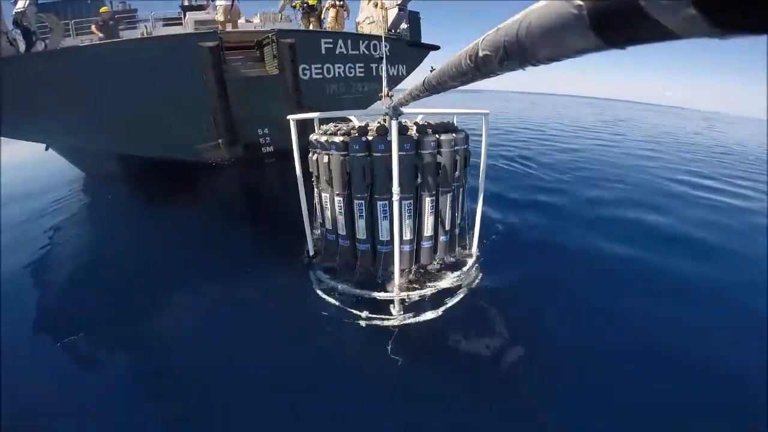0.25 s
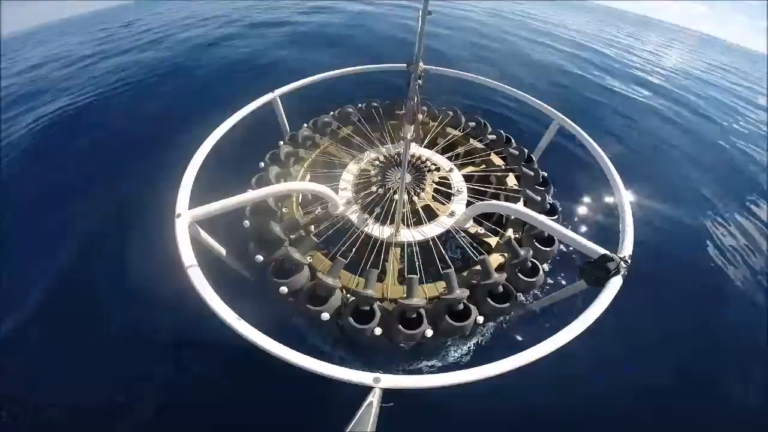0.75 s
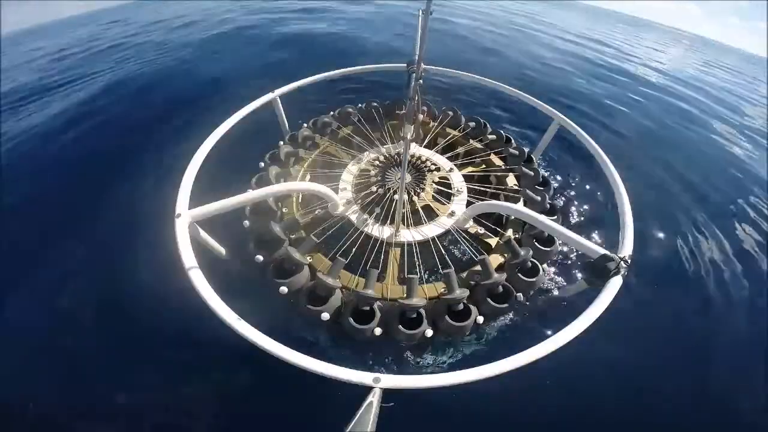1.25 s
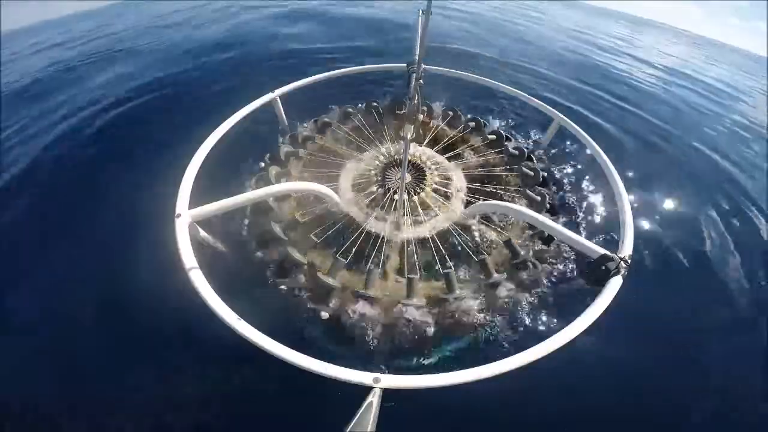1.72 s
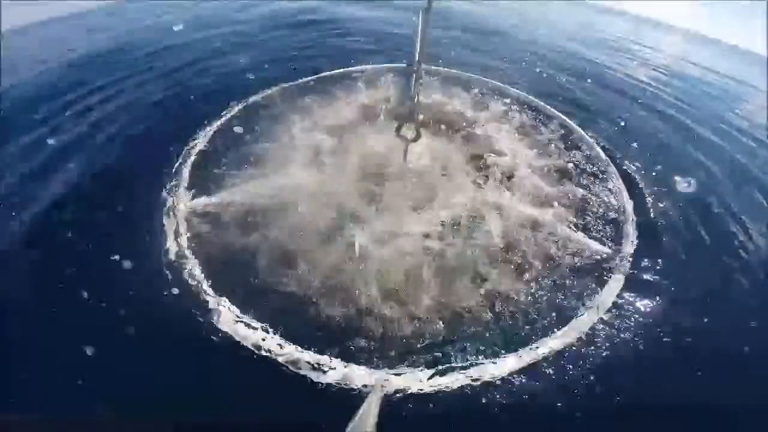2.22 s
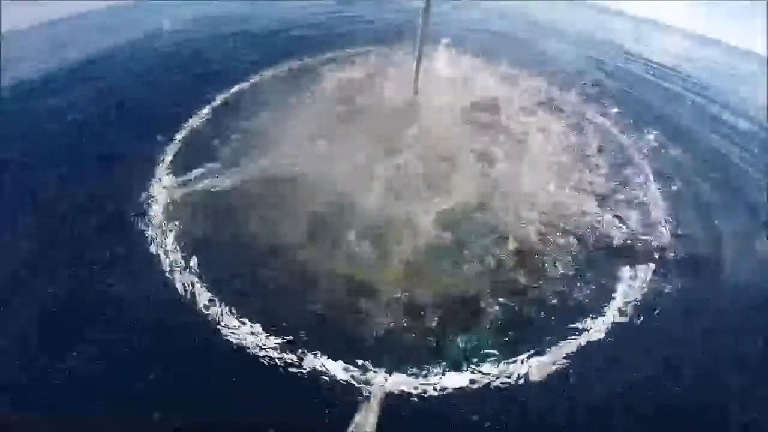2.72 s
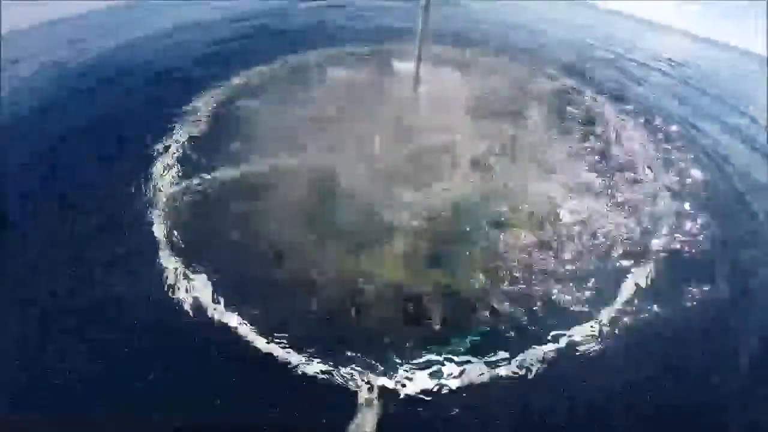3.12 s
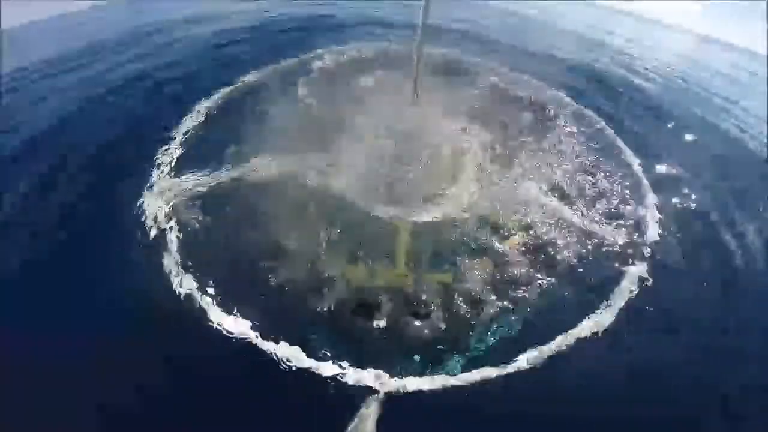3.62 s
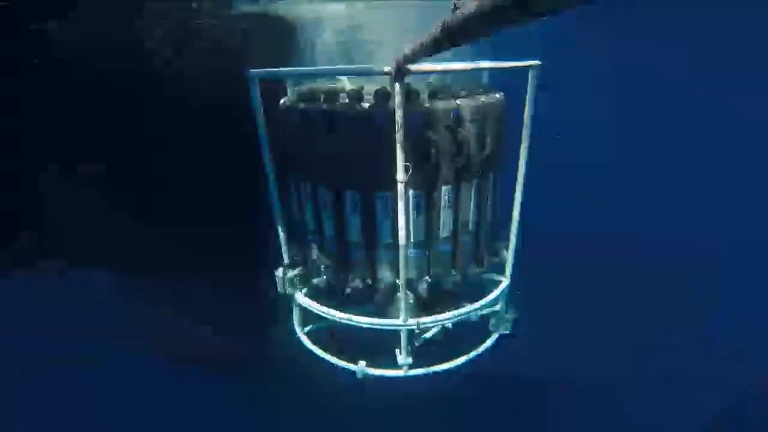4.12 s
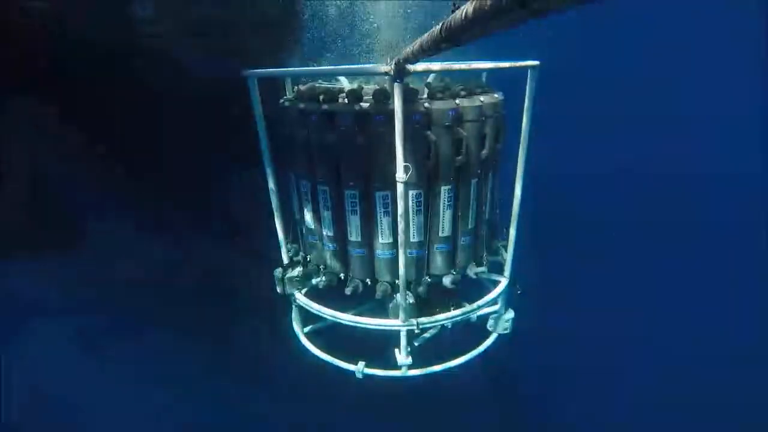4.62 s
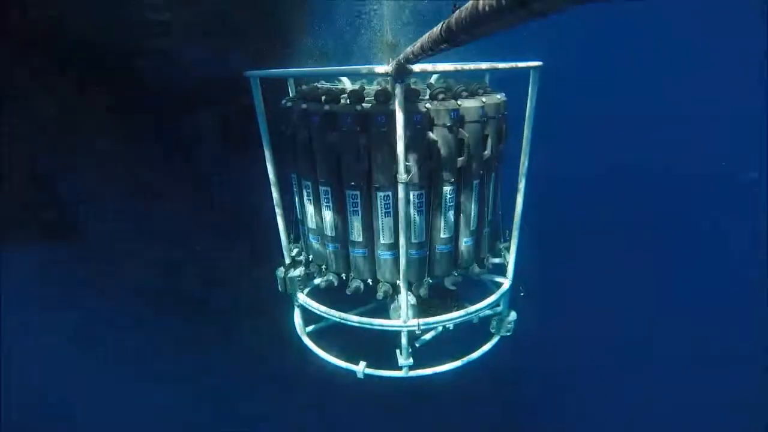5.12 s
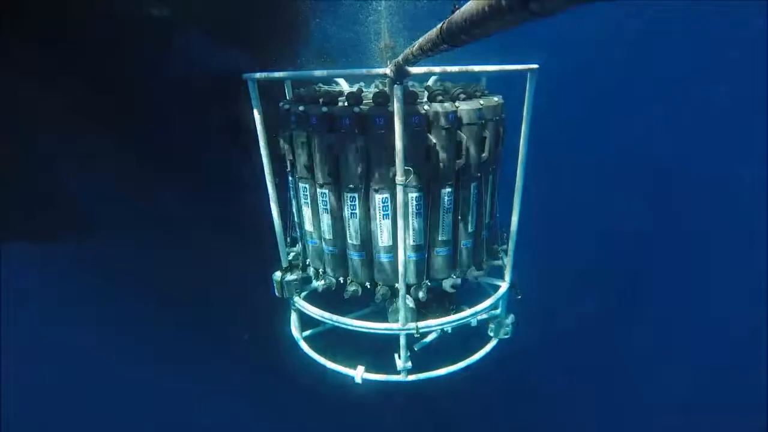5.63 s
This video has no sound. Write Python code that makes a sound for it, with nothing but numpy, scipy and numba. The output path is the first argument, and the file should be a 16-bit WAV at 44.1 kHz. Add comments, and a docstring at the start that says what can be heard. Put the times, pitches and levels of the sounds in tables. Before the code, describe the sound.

Deck machinery hums briefly under light lapping and ticks. After an abrupt cut, seawater gushes in fits through tubes and bottles close to the microphone, over a low cable drone, then settles with faint pings, a knock and a faint winch whine. Another cut puts the microphone under water in a sealed housing, where air crackles and large, muffled bubbles gurgle and thump over a deep slosh.

```python
"""A sealed housing follows a sampling frame into the sea: three places, joined by hard cuts.
First, on a rumbling pole, deck machinery hums while water laps and drips and fittings tick.
Then, on the frame, the taut cable drones and water surges through ringing tubes and bottles;
a fitting pings, the far winch whines, one knock lands. Last, under water, the pole thrums, the housing
creaks, air crackles against it, big bubbles ring, water thumps and an air pocket empties in a gulp."""
import sys
import numpy as np
from scipy import signal
from scipy.fft import rfft, irfft
from scipy.io import wavfile
from scipy.ndimage import uniform_filter1d
from numba import njit

SR = 44100
rng = np.random.default_rng(int(sys.argv[2]) if len(sys.argv) > 2 else 0)


def log_audio(samples):
    """Write samples as a 16-bit WAV file to the path given in sys.argv[1]."""
    # one column per channel
    frames = np.atleast_2d(samples).T
    # limit to full scale, then quantise
    limited = np.clip(frames, -1, 1)
    pcm = np.round(limited * 32767).astype(np.int16)
    wavfile.write(sys.argv[1], SR, pcm)


N = 258426
t = np.arange(N) / SR
CUT_FRAME_S, CUT_SEA_S = .747, 3.917
UNDERWATER = CUT_SEA_S, N / SR


def undb(db):
    return 10 ** (np.asarray(db) / 20)

def unit(x):
    """Scale to rms 1."""
    return x / np.sqrt(np.mean(x ** 2))

def steady(x, seconds):
    """Even out level changes slower than the given time."""
    return unit(x / np.sqrt(uniform_filter1d(x ** 2, int(seconds * SR)) + 1e-12))

def curves(table):
    """A table's columns as smooth automation, one value a sample."""
    s, *columns = np.transpose(table)
    return [np.interp(t, s, column) for column in columns]

def walk(rate_hz):
    """Smooth random wobble with a spread near 1."""
    hold = int(SR / rate_hz)
    steps = np.repeat(rng.standard_normal(N // hold + 1), hold)
    return 1.85 * uniform_filter1d(uniform_filter1d(steps, hold), hold)[:N]

def noise(db=0):
    return undb(db) * rng.standard_normal(N)

def tone(hz):
    """A sine of rms 1 that follows a pitch curve."""
    return np.sqrt(2) * np.sin(2 * np.pi * np.cumsum(hz) / SR)

def shaped(spectrum):
    """Noise of rms 1, coloured by an EQ curve."""
    bins_hz = np.arange(N // 2 + 1) * SR / N + 1
    hz, db = np.transpose(spectrum)
    return unit(irfft(rfft(noise()) * undb(np.interp(np.log(bins_hz), np.log(hz), db)), N))

def band(lo_hz, hi_hz, x):
    return signal.sosfilt(signal.butter(3, [lo_hz, hi_hz], "bandpass", fs=SR, output="sos"), x)

@njit
def svf(x, hz, width):
    """State-variable band-pass, gain 1 at the centre."""
    y, mid, low = np.empty(len(x)), 0., 0.
    g, k = np.tan(np.pi * hz / SR), width / hz
    for i in range(len(x)):
        v = (mid + g * (x[i] - low)) / (1 + g * (g + k))
        mid, low, y[i] = 2 * v - mid, low + 2 * g * v, k * v
    return y

def resonate(x, hz, width):
    """The same band-pass twice, for steeper skirts."""
    return svf(svf(x, float(hz), float(width)), float(hz), float(width))

def ring(x, modes):
    """Excite a bank of resonances; the sum has rms 1."""
    return unit(sum(undb(db) * resonate(x, hz, 1.2 * width) for hz, width, db in modes))

@njit
def grains(start, size, hz, tau, rise, glide):
    """Damped sines: start and decay tau in s, attack as a share of tau, pitch up by glide per tau."""
    out = np.zeros(N)
    for k in range(len(start)):
        first, phase, n = int(start[k] * SR), 0., tau[k] * SR
        for j in range(min(int(6 * n), N - first)):
            phase += 2 * np.pi * hz[k] * (1 + glide * j / n) / SR
            out[first + j] += size[k] * (1 - np.exp(-j / (rise * n))) * np.exp(-j / n) * np.sin(phase)
    return out

def bubbles(table, rise, glide):
    """Each cued bubble rings and climbs in pitch, fading by about 17 dB over its cycles."""
    s, db, hz, cycles = np.transpose(table)
    return grains(s, undb(db), hz, cycles / hz / 2, rise, glide)

def swarm(count, span, lo_hz, hi_hz, cycles, scatter_db, rise, glide):
    """Random bubbles spread evenly over the octaves, held at a steady level."""
    when, pitch, size, length = rng.random((count, 4)).T
    hz = lo_hz * (hi_hz / lo_hz) ** pitch
    start = span[0] - .1 + (span[1] - span[0] + .1) * when
    out = grains(start, undb(-scatter_db * np.log(size)), hz, cycles * (.5 + length) / hz, rise, glide)
    return out / np.sqrt(uniform_filter1d(out ** 2, SR // 10) + 1e-9)


# Faders on the pole. Each row: time in seconds, then rumble, deck body and deck treble in dB.
POLE_FADERS = [(0.03, -24.5, -42, -54.5), (0.162, -29.5, -49, -55.5), (0.26, -33.5, -43, -51.5),
               (0.358, -44, -42.5, -49.5), (0.43, -35.5, -40.5, -57), (0.55, -46, -43.5, -55.5),
               (0.73, -29, -44.5, -58)]
# Colour of the deck noise. Each row: frequency in Hz, relative level in dB.
DECK_EQ = [(82, -50), (140, 7.5), (199, -2), (267, 8), (529, 2.5), (669, 3.5), (1110, -15), (1200, -4),
           (1350, -13), (1750, -19), (4210, -40.5), (5640, -36.5), (6600, -51), (9760, -53), (15000, -63)]

def pole_and_deck():
    """The hand-held pole rumbles under broad, flickering deck noise."""
    rumble_db, body_db, treble_db = curves(POLE_FADERS)
    deck = shaped(DECK_EQ)
    rumble = undb(rumble_db) * tone(38.5 * (1 + .084 * walk(22)))
    body = undb(body_db + walk(39.1)) * unit(band(120, 2200, deck))
    treble = undb(treble_db + 1.5 * walk(160.2)) * unit(band(3100, 15000, deck))
    return rumble + body + treble

def machinery(hum_hz=103, throb_hz=12.7):
    """Deck machinery hums, throbbing in level and wavering in pitch."""
    db = -42 + 4 * np.cos(2 * np.pi * throb_hz * (t - .296)) + 3.4 * walk(31.2)
    return undb(db) * tone(hum_hz * (1 + .0415 * walk(32)))

def lapping():
    """Lapping water sheds a few faint bubbles."""
    return undb(-60.5) * swarm(40, (.1, CUT_FRAME_S), 720, 3150, cycles=5.4, scatter_db=4, rise=.3,
                               glide=.044)

# Droplets and small bubbles, plus a ping's ring at 0.805 s and a tick's tone at 2.79 s. Each row: start in
# seconds, level in dB, pitch in Hz, length in cycles.
DROPLETS = [(.135, -33, 623, 8), (.195, -26.5, 527, 4.5), (.22, -26.5, 564, 8.9), (.23, -37, 1760, 8),
            (.283, -48, 2600, 12), (.365, -36, 1760, 28), (.428, -35, 1180, 17), (.485, -35, 624, 10),
            (.525, -44, 830, 12), (.552, -43, 3050, 14), (.665, -35, 612, 17), (.705, -33, 626, 10),
            (.805, -23, 1290, 14), (.814, -9.5, 350, 6.5), (.857, -9.5, 340, 4.8), (.872, -22, 1308, 70),
            (1.495, -29, 2080, 29), (.842, -15, 1253, 20), (1.508, -27.5, 970, 29), (1.55, -20, 662, 10),
            (1.585, -20.5, 987, 36), (1.635, -19, 692, 12), (1.652, -12.5, 193.5, 16), (1.705, -32, 653, 9),
            (1.968, -6.5, 188.8, 7), (2.085, -29, 707, 9.4), (2.098, -21, 422, 6.6), (2.13, -28, 1010, 3.7),
            (2.134, -18, 1570, 4.5), (2.155, -22, 402, 7), (2.19, -19, 222, 5.5), (2.245, -16, 314, 7.8),
            (2.455, -19.5, 209, 9.5), (2.571, -26.5, 3820, 26), (2.571, -29.5, 2050, 12),
            (2.7935, -11, 1400, 2.1), (3.026, -38, 3050, 32), (3.928, -15, 1103, 5.5),
            (3.9835, -15, 1130, 7), (3.998, -15, 1970, 8.3), (4.015, -8.5, 1280, 4.5),
            (4.036, -10, 1040, 9.5), (4.058, 0, 975, 3.8), (4.148, -17, 1740, 4.7), (4.214, -29, 1510, 6),
            (4.216, -5, 4580, 5.1), (4.242, -29, 1070, 6.9), (4.294, -1.5, 1110, 4.8),
            (4.364, -20.5, 950, 6), (4.407, -28, 1160, 4.8), (4.425, -16.5, 3350, 11.4),
            (4.461, -11, 4800, 11.3), (4.476, -9.5, 1150, 2.6), (4.659, -19.5, 961, 6),
            (4.957, -24, 890, 5.3), (5.31, -21.5, 940, 6.5), (5.353, -17.5, 910, 5),
            (5.504, -17, 1054, 3.4)]
# One chirping drip, with the same columns.
CHIRPING_DRIP = [(.526, -30.5, 2200, 14)]

def droplets():
    """Small bubbles plink in all three places; one drip climbs fast."""
    return bubbles(DROPLETS, rise=.27, glide=.006) + bubbles(CHIRPING_DRIP, rise=.49, glide=.12)

def cracks(rows, length=1500, snap_s=.00062):
    """Noise cracks, each with a coloured centre, a duller body and a top end that dies sooner."""
    out, age = np.zeros(N), np.arange(length) / SR
    for s, db, hz, top_db in rows:
        t60_s = .011 if s < 3.9 else .013  # a little longer under water
        burst = rng.standard_normal(length) * 1000 ** (-age / t60_s)
        body = resonate(burst, hz, .18 * hz) + .63 * resonate(burst, 1700, 2900)
        top = resonate(burst * np.exp(-age / snap_s), 8500, 13000)
        crack = body / np.abs(body).max() + undb(top_db) * top / np.abs(top).max()
        i = int(s * SR)
        out[i:i + length] += (undb(db) * crack)[:N - i]
    flooded = np.clip((t - 4.4) / .148, 0, 1)  # the flooded port muffles the top end
    return (1 - .62 * flooded) * band(400, 11000, out) + 1.27 * flooded * band(400, 5300, out)

def faint_ticks(count, span, db):
    """Cue rows for faint ticks at random times."""
    when, size, pitch = rng.random((count, 3)).T
    start = span[0] + (span[1] - span[0]) * when
    top_db = -35 + 6 * rng.standard_normal(count)
    return list(zip(start, db - 3.5 * np.log(size), 2200 * 1.4 ** pitch, top_db))

# Sharp ticks. Each row: start in seconds, level in dB, centre in Hz, top end in dB against the body.
SHARP_TICKS = [(.2595, -35, 4650, -14), (.3253, -45, 4720, -14), (.3468, -31, 5480, -10),
               (.3612, -29.5, 5400, -8), (.388, -32, 2600, -22), (2.4419, -26, 4900, -35),
               (2.5441, -33, 2210, -4), (2.6746, -30.5, 2463, -29), (2.7843, -20, 2800, -6),
               (2.7933, -16.5, 2400, -32), (2.8478, -21, 2300, -11), (2.9779, -35, 2580, -17),
               (3.2213, -43, 5930, -22), (3.924, -22.5, 4010, -40), (3.9363, -41, 3110, -24),
               (3.988, -25, 2600, -31), (4.0457, -14.5, 4740, -29), (4.053, -27, 2700, 6),
               (4.059, -6.5, 3380, -38), (4.0718, -30, 2230, 7), (4.079, -30, 2730, 7),
               (4.1003, -25, 7460, -22), (4.1174, -29, 2800, -20), (4.1658, -20, 4470, -31),
               (4.1804, -25, 2910, -27), (4.2157, -16, 4610, -25), (4.2265, -19, 2660, -25),
               (4.2378, -16.5, 2700, -28), (4.2565, -15.5, 2370, -36), (4.2671, -14.5, 2520, -38),
               (4.2754, -20, 3280, -29), (4.2936, -22, 3270, -20), (4.3435, -31, 2590, -10),
               (4.4605, -24, 2470, -20), (4.4674, -27, 3790, -25), (4.4777, -33.5, 2250, -33.5),
               (4.557, -42, 7800, -23.5), (4.573, -49, 3800, -24), (4.589, -37, 1670, -29),
               (4.6106, -30.5, 3360, -37), (4.634, -36, 1490, -34), (4.659, -34.5, 1400, -37),
               (4.691, -33, 2900, -30), (4.7019, -30.5, 2170, -30), (4.7622, -39, 2000, -26),
               (4.9568, -37, 1490, -30), (4.9807, -39, 1400, -30), (5.0057, -40, 1500, -32),
               (5.0286, -40, 1420, -33), (5.0501, -42, 2620, -36), (5.2142, -39.5, 2400, -28.5),
               (5.2945, -42.5, 2280, -30), (5.31, -39.5, 1980, -27), (5.3314, -38, 1500, -20),
               (5.3534, -31.5, 1500, -26), (5.3778, -32.5, 1500, -32), (5.4811, -35, 2910, -34),
               (5.6856, -40.5, 2700, -27), (5.8218, -34, 1900, -29), (5.8408, -51, 3200, -24),
               (4.711, -42, 5000, -28), (4.741, -44, 3030, -12.5), (4.81, -53, 3000, -14),
               (4.6826, -35, 2600, -34), (4.8772, -39, 2760, -18), (4.887, -41, 3030, 8),
               (5.133, -40, 3040, 0), (5.1665, -33, 4770, -32), (5.243, -44, 3000, -21.5),
               (5.405, -40, 3500, -29.5), (5.464, -42.5, 3000, -20), (5.49, -39, 2720, 3),
               (5.76, -39, 4200, -16), (5.7803, -34, 3030, -34.5)]

def ticks():
    """Frame and housing tick sharply, with fainter ticks scattered between."""
    faint = faint_ticks(8, (2.4, 3.2), db=-50) + faint_ticks(12, UNDERWATER, db=-48.5)
    return cracks(list(SHARP_TICKS) + faint)

# The cable's drone. Each row: time in seconds, pitch in Hz, level in dB.
CABLE_DRONE = [(0.79, 67.7, -44), (0.87, 73.8, -25), (1.01, 71.3, -25.5), (1.27, 72.8, -37.5),
               (1.35, 71.6, -33), (1.4, 74.2, -39), (1.41, 74, -50), (1.45, 73.8, -28.5), (1.52, 64.9, -38),
               (1.58, 64, -35), (1.65, 69.4, -16), (1.72, 70, -17.5), (1.78, 69, -29), (1.83, 71.3, -17),
               (1.87, 71.7, -24.5), (1.93, 65.5, -14), (1.96, 64.7, -24), (2.05, 65.2, -13.5),
               (2.08, 65.25, -27), (2.15, 65, -16.5), (2.17, 65.2, -30), (2.24, 60.7, -24),
               (2.27, 61.4, -17.5), (2.33, 61, -31), (2.42, 62.8, -22), (2.44, 63.2, -29), (2.49, 63, -23),
               (2.76, 62.8, -16.5), (3.03, 62.2, -39.5), (3.14, 63.4, -29), (3.41, 63, -45.5),
               (3.52, 62.9, -36.5), (3.64, 61.2, -60), (3.75, 61.7, -52), (3.81, 67.9, -61),
               (3.9, 68.6, -53)]

def cable():
    """The taut cable vibrates on one low, unsteady note."""
    hz, db = curves(CABLE_DRONE)
    return undb(db + 1.8 * walk(30.1)) * tone(hz * (1 + .0287 * walk(24.44)))

# The frame's sway. Each row: time in seconds, level in dB.
SWAY_FADER = [(.747, -28), (.772, -25), (.8, -31.5), (1.0, -24), (1.45, -39.5), (1.7, -39), (1.9, -25),
              (2.4, -31), (3., -35.5), (3.55, -52), (3.87, -37.5)]

def sway():
    """The slowly swaying frame makes a sub-bass rumble."""
    return undb(curves(SWAY_FADER)[0] + walk(15)) * steady(band(6.2, 31.2, noise()), .113)

# Colour of the sea air. Each row: frequency in Hz, relative level in dB.
AIR_EQ = [(53, -36), (90, -3), (161, 0), (443, -21.5), (527, -12), (697, -28.5), (1300, -14), (1720, -30),
          (2650, -29), (4160, -37), (5880, -38), (7500, -40.5), (8600, -45), (12500, -49), (15500, -65)]

def sea_air():
    """A steady, dark bed of open air."""
    return undb(-46) * shaped(AIR_EQ)

# The surge, then the calm. Each row: time in seconds, then tubes, wash and spray in dB.
SURGE_FADERS = [(0.79, -52, -51.5, -58), (0.806, -50, -40, -43), (0.82, -40, -28.5, -40),
                (0.85, -26, -24.5, -37.5), (0.9, -28.5, -31.5, -39.5), (0.94, -29.5, -36.5, -44.5),
                (1.012, -32.5, -45, -52.5), (1.106, -26, -39.5, -41.5), (1.19, -32.5, -44.5, -53.5),
                (1.4, -40.5, -44.5, -52), (1.474, -48, -47, -53), (1.492, -41.5, -40.5, -46),
                (1.58, -34, -38, -42), (1.66, -27, -32, -44.5), (1.79, -26.5, -36, -44.5),
                (1.86, -27.5, -38, -40.5), (1.93, -25, -37.5, -38), (1.994, -33, -38.5, -47),
                (2.04, -33, -42, -50.5), (2.075, -30.5, -39, -39.5), (2.104, -31, -36, -47),
                (2.18, -27, -39, -46), (2.3, -39.5, -40, -48.5), (2.484, -32.5, -41, -51.5),
                (2.72, -44.5, -50, -61), (3.02, -55.5, -54, -56.5), (3.3, -50, -60.5, -66),
                (3.87, -71, -64, -69)]
# The bottles' whistle. Each row: time in seconds, level in dB.
WHISTLE_FADER = [(0.76, -68), (0.846, -36.5), (0.992, -58), (1.094, -47), (1.456, -60.5), (1.484, -47),
                 (1.662, -34.5), (1.678, -44), (1.926, -41.5), (1.992, -54), (2.11, -43.5), (2.472, -58),
                 (2.58, -59), (2.618, -78), (2.682, -57), (2.7, -74)]
# Four banks of resonances. Each row: centre in Hz, nominal width in Hz, relative level in dB.
TUBE_MODES = [(143, 12, -8), (188.5, 17, 4.5), (205.9, 38, -3), (292, 60, -4), (333, 23.5, -6.5),
              (438.3, 15, -14)]
WASH_MODES = [(664, 126, 18), (964, 250, 9), (1277, 81, 19.5), (734, 810, 9)]
BOTTLE_MODES = [(2338, 156, 0)]
SPRAY_MODES = [(1580, 940, -1), (3180, 1200, 1.5), (4720, 650, 5.5), (5840, 890, 0.5), (7450, 960, -15),
               (7270, 350, -5), (9100, 8300, -19), (12500, 3200, -31)]

def surge():
    """Turbulent water rings tubes and bottles in fits, with plopping wash and spray."""
    tube_db, wash_db, spray_db = curves(SURGE_FADERS)
    fits = walk(45.24)  # one buffeting drives all the resonances
    tubes = steady(ring(noise(.86 * fits), TUBE_MODES), .074)
    wash = steady(ring(noise(fits + 2.2 * walk(90)), WASH_MODES), .077)
    plops = swarm(500, (CUT_FRAME_S, CUT_SEA_S), 461, 1486, cycles=11.5, scatter_db=3.5, rise=.36,
                  glide=.022)
    whistle = steady(ring(noise(1.2 * fits + 3.2 * walk(59.8)), BOTTLE_MODES), .075)
    spray = np.zeros(N)
    for hz, width, db in SPRAY_MODES:
        flicker_db = 2.1 * fits + 2.77 * walk(350) + 2 * walk(22.07)
        spray += undb(db) * np.sqrt(width) * ring(noise(flicker_db), [(hz, width, 0)])
    return (undb(tube_db) * tubes + undb(wash_db) * (wash + undb(-4.5) * plops)
            + undb(curves(WHISTLE_FADER)[0]) * whistle + undb(spray_db) * steady(spray, .074))

# A fitting's pings. Each row: start in seconds, relative level in dB, pitch in Hz.
FITTING_PINGS = [(2.2504, -30, 1250), (2.2702, -28.5, 1262), (2.294, -21.5, 1205), (2.346, -39, 1260),
                 (2.363, -26, 1243), (2.414, -30, 1314), (2.456, -29.5, 1224), (2.5694, -33.5, 1220),
                 (2.7682, -24.5, 1268), (2.978, -21.5, 1128), (3.084, -40, 1297), (3.1932, -43, 1370),
                 (3.422, -39.5, 1315), (3.5724, -35, 1320), (3.666, -39.5, 1230), (3.707, -35.5, 1335),
                 (3.8482, -36, 1310)]

def pings(t60_s=.059):
    """A fitting rings briefly, with a close upper and a weak lower partial."""
    s, db, hz = np.transpose(FITTING_PINGS)
    tau = np.full(len(s), t60_s / np.log(1000))
    main = grains(s, undb(db + 5), hz, tau, rise=.14, glide=0.)
    upper = grains(s, undb(db - 12), 1.057 * hz, .6 * tau, rise=.15, glide=0.)
    lower = grains(s, undb(db - 17), .56 * hz, tau, rise=.15, glide=0.)
    return -(main + upper + lower)

# The winch's whines. Each row: start and end in seconds, pitch in Hz, level in dB.
WINCH_WHINES = [(2.725, 2.868, 1563, -47), (3.285, 3.444, 2510, -58), (3.295, 3.422, 1870, -59),
                (3.685, 3.795, 2600, -59), (3.7, 3.783, 1910, -62)]

def winch(width_hz=130):
    """The far winch whines in rough, narrow tones that swell and fade."""
    out = np.zeros(N)
    for start, end, hz, db in WINCH_WHINES:
        swell = np.sin(np.pi * np.clip((t - start) / (end - start), 0, 1))
        out += undb(db) * swell * ring(noise(), [(hz, width_hz, 0)])
    return out

# The knock. Each row: start in seconds, relative level in dB, pitch in Hz, seconds to fall 60 dB.
DRY_KNOCK = [(2.8478, -6, 1490, 0.0082)]

def knock():
    """One hard, dry blow excites two partials that die at once."""
    s, db, hz, t60 = np.transpose(DRY_KNOCK)
    tau = t60 / np.log(1000)
    main = grains(s, undb(db + 2), hz, tau, rise=.04, glide=0.)
    lower = grains(s, undb(db - 11), .64 * hz, tau, rise=.07, glide=0.)
    return -band(150, 7500, main + lower)

def thrum(hz=95.4, again_s=4.24, fade_db_per_s=91):
    """The pole resonates twice as it goes under."""
    first = undb(-18.5 - fade_db_per_s * np.maximum(t - CUT_SEA_S, 0))
    attack = np.clip((t - again_s) / .052 + 1, 0, 1)
    second = attack * undb(-26.5 - fade_db_per_s * np.maximum(t - again_s, 0))
    return (first + second) * steady(ring(noise(), [(hz, 9.5, 0)]), .073)

# The slosh. Each row: time in seconds, level in dB.
SLOSH_FADER = [(3.92, -31), (4.2, -29.5), (4.35, -28.5), (4.8, -27.5), (5., -28), (5.25, -24),
               (5.49, -46.5), (5.8, -46)]

def slosh():
    """Water sloshes on the housing as a deep, uneven rumble."""
    rumble = steady(undb(3.6 * walk(22)) * band(24, 56, noise()), .05)
    return undb(curves(SLOSH_FADER)[0] + 2 * walk(14)) * rumble

# The bubble cloud. Each row: time in seconds, then gurgle, bubbling and fizz in relative dB.
CLOUD_FADERS = [(3.92, -28.5, -29, -36), (4., -39, -35, -35), (4.09, -28.5, -31.5, -36),
                (4.15, -54, -43, -43.5), (4.24, -21, -17.5, -35.5), (4.31, -29.5, -24.5, -40),
                (4.41, -12, -18.5, -37), (4.435, -14, -10.5, -40.5), (4.524, -18, -16.5, -50.5),
                (4.7, -17, -22, -44), (4.76, -9.5, -11, -61.5), (4.79, -26, -22.5, -52.5),
                (4.93, -12, -20.5, -52.5), (5., -26.5, -28, -48.5), (5.116, -13.5, -17, -50),
                (5.352, -20, -19, -49.5), (5.492, -13.5, -21, -57), (5.774, -15, -23.5, -45),
                (5.84, -27, -16, -50.5)]
# Air trapped at the housing. Each row: centre in Hz, nominal width in Hz, relative level in dB.
POCKET_MODES = [(130, 44, 0)]

def bubble_cloud():
    """Large bubbles gurgle around a ringing air pocket; tiny ones fizz and crackle."""
    gurgle_db, bubbling_db, fizz_db = curves(CLOUD_FADERS)
    gurgle = swarm(280, UNDERWATER, 171.2, 296, cycles=4.1, scatter_db=.5, rise=.68, glide=.0058)
    pocket = steady(ring(noise(walk(33)), POCKET_MODES), .086)
    bubbling = swarm(280, UNDERWATER, 309.6, 635, cycles=4.86, scatter_db=2, rise=.69, glide=.0066)
    fizz = swarm(1500, UNDERWATER, 845, 1900, cycles=2.4, scatter_db=3, rise=.2, glide=.04)
    crackle = swarm(1800, UNDERWATER, 1600, 3770, cycles=3.6, scatter_db=6, rise=.43, glide=.014)
    large = undb(gurgle_db) * (undb(-7) * gurgle + undb(-5.5) * pocket)
    large += undb(bubbling_db - 3.5) * bubbling
    tiny = undb(fizz_db) * (fizz + undb(-8) * band(1100, 5600, crackle))
    return band(40, 740, large) + tiny

def middle_bubbles(grow_db_per_s=8.5, burst_s=5.22):
    """Mid-sized bubbles grow louder, with one brief burst."""
    cloud = swarm(300, UNDERWATER, 597, 798, cycles=4.2, scatter_db=3, rise=.54, glide=.0021)
    burst_db = 20 * np.exp(-((t - burst_s) / .022) ** 2)
    return undb(-48 + grow_db_per_s * (t - CUT_SEA_S) + burst_db) * band(560, 883, cloud)

# Colour of the fine seething. Each row: frequency in Hz, relative level in dB.
SEETHE_EQ = [(700, -19.5), (1000, 11.5), (2070, -6), (2640, -4.5), (3500, -11), (4200, -24), (7800, -52)]

def fine_air(fade_db_per_s=26.5, floor_db=-68.5):
    """The finest air sizzles and fades over a constant, flickering seethe."""
    sizzle = unit(undb(3.8 * walk(270) + 3.4 * walk(45)) * resonate(noise(), 4300, 5000))
    sizzle_db = np.maximum(-49 - fade_db_per_s * (t - CUT_SEA_S), floor_db)
    return undb(sizzle_db) * sizzle + undb(-60.5 + 2.5 * walk(48)) * shaped(SEETHE_EQ)

def creak(start_s=3.9835, gap_s=.0036, db=-39, hz=4040, top_db=-11):
    """The housing creaks in a quick train of ticks."""
    return cracks([(start_s + k * gap_s, db, hz, top_db) for k in range(10)])

# Loud single bubbles. Each row: start in seconds, level in dB, pitch in Hz, length in cycles.
BIG_BUBBLES = [(4.201, -12.5, 620, 4.3), (4.218, -9, 292, 1.8), (4.237, -4.5, 404, 2.8),
               (4.262, 8.5, 490, 1.6), (4.274, -8, 450, 1.6), (4.293, 3, 582, 4.7), (4.331, -11, 485, 7.9),
               (4.361, -1, 384, 1.3), (4.429, 4, 418, 8.6), (4.466, 4.5, 232, 4.1), (4.475, 6, 456, 5.6),
               (4.503, -0.5, 429, 7.1), (4.54, -2.5, 156, 3), (4.63, -7, 452, 21), (4.668, -8, 550, 23),
               (4.722, -1, 145.5, 5.8), (4.725, -2, 528, 26), (4.752, -4, 647, 12.6),
               (4.802, -4.5, 144, 5.3), (4.821, -8.5, 511, 20), (4.858, -1.5, 486, 11.5),
               (4.92, 0.5, 497, 4.8), (4.93, -4.5, 615, 6.9), (4.972, -5.5, 565, 12.7),
               (5.025, -2.5, 141.5, 8), (5.05, -5, 548, 8.7), (5.1, -4, 240, 4), (5.119, 2.5, 226, 5.7),
               (5.145, -3, 484, 5), (5.195, -1, 592, 9.3), (5.237, 4, 598, 13), (5.269, 0.5, 205, 4.2),
               (5.295, -1.5, 106.4, 1.4), (5.3, -2.5, 545, 7.8), (5.356, -3.5, 230, 3.2),
               (5.358, -5, 494, 4.7), (5.4, -0.5, 198, 4.3), (5.445, -6.5, 655, 3.5), (5.455, 0, 260, 2),
               (5.532, -0.5, 259, 3.7), (5.576, -4, 178, 2.9), (5.63, -6.5, 306, 2.2), (5.642, -8, 576, 20),
               (5.69, -9, 123.4, 8.8), (5.692, -17, 620, 6.5), (5.72, -5.5, 238, 9.3),
               (5.772, -1.5, 555, 5.4), (5.781, 4, 537, 6.1), (5.813, -10, 630, 5.2),
               (5.826, 4.5, 462, 3.7)]

def big_bubbles():
    """Big bubbles ring; the sealed housing passes little above their own pitch."""
    return band(40, 740, bubbles(BIG_BUBBLES, rise=.46, glide=.0065))

# Blows of water. Each row: centre in seconds, peak in dB, pitch in Hz, half-width in cycles.
WATER_THUMPS = [(4.2486, -8, 258, 0.33), (4.426, -5.5, 246, 0.8), (4.6213, -0.5, 286, 0.39),
                (4.671, -10, 330, 0.76), (4.7618, -6.5, 385, 1), (4.913, -5, 190, 0.24),
                (5.274, -9, 300, 0.76), (5.4189, -1.5, 320, 0.44), (5.491, -1, 190, 0.46),
                (5.536, -2, 203, 0.53), (5.58, -3, 198, 0.56), (5.6324, -5, 254, 0.45)]

def thumps(tick_hz=2480, tick_top_db=-23):
    """Water hits the housing: each blow is a smooth inward push with a faint tick."""
    out = cracks([(s - .002, db - 36.5, tick_hz, tick_top_db) for s, db, _, _ in WATER_THUMPS])
    for s, db, hz, cycles in WATER_THUMPS:
        near = slice(int((s - .02) * SR), int((s + .02) * SR))
        turns = hz * (t[near] - s)
        out[near] -= undb(db) * np.cos(2 * np.pi * turns) * np.exp(-(turns / cycles) ** 2)
    return out

def gulp(start_s=5.37, end_s=5.77, start_hz=56):
    """A long gulp climbs an octave, ever faster, as the air pocket empties."""
    octaves = np.clip((t - start_s) / (end_s - start_s), 0, 1) ** 1.1
    db = np.interp(t, [start_s, end_s], [-23.7, -28], left=-28.5) + 2 * walk(24.96)
    gate = np.interp(t, [start_s - .03, start_s, end_s - .026, end_s], [0, 1, 1, 0])
    return gate * undb(db) * tone(start_hz * 2 ** octaves)

def scene():
    """Cut from pole to frame to sea; droplets and ticks run through all three."""
    on_pole = pole_and_deck() + machinery() + lapping()
    throughout = droplets() + ticks()
    on_frame = cable() + sway() + sea_air() + surge() + pings() + winch() + knock()
    in_sea = (thrum() + slosh() + bubble_cloud() + middle_bubbles() + fine_air() + creak()
              + big_bubbles() + thumps() + gulp())
    places = np.select([t < CUT_FRAME_S, t < CUT_SEA_S], [on_pole, on_frame], in_sea)
    return (places + throughout)[None]

def record(dry):
    """Soft saturation rounds the loudest peaks; a steep low-pass cuts the top."""
    rounded = np.tanh(.56 * dry) / .61
    return signal.sosfilt(signal.ellip(8, .2, 70, 15900, fs=SR, output="sos"), rounded)


dry = scene()
out = record(dry)
log_audio(out)
```